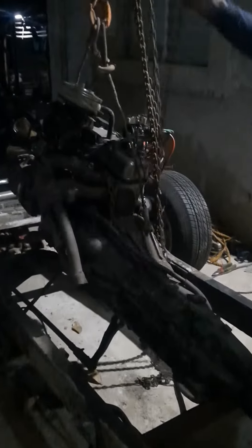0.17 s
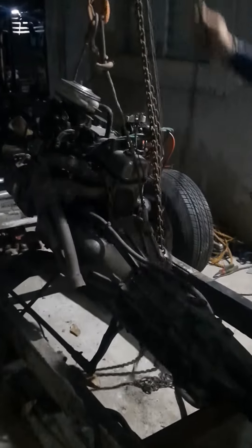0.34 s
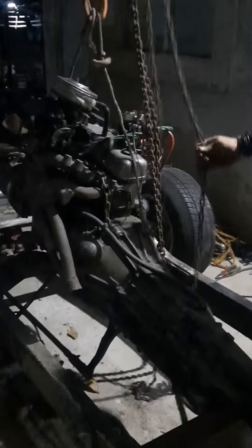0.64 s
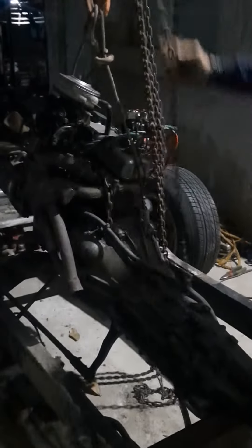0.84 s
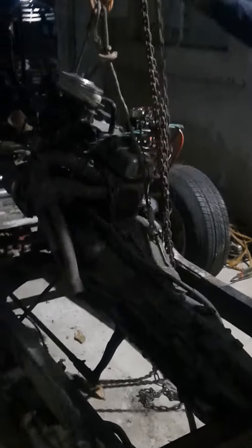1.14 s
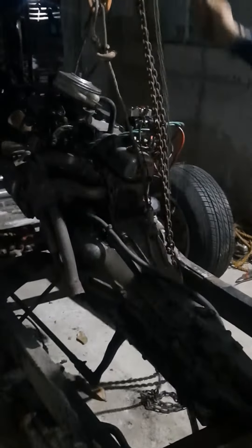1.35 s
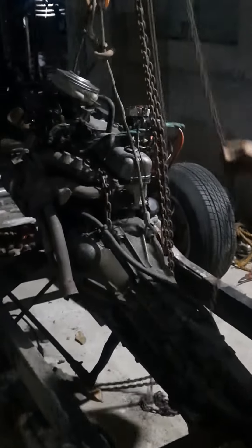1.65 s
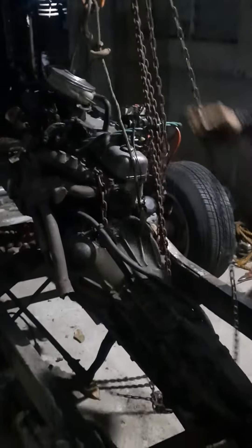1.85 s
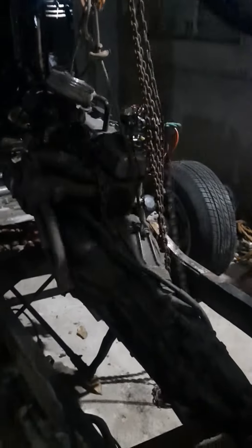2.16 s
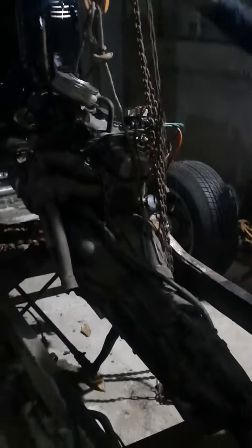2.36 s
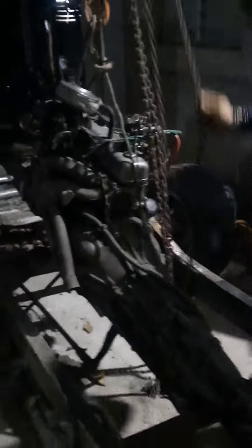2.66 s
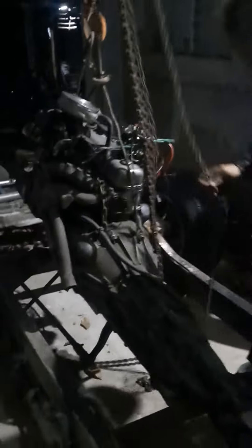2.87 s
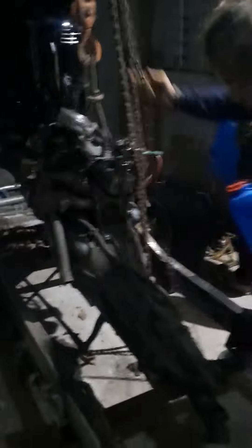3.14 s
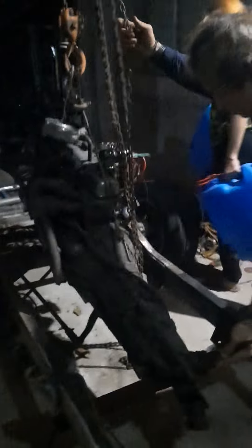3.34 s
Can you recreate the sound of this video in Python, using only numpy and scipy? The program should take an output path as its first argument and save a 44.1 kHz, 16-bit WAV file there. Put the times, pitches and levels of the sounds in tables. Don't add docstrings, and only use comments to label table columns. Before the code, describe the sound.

Chain hoist in a concrete workshop: a few slack link slaps, then three dense bursts of metallic ratcheting with dull knocks and low booms, separated by short lulls; close stereo pickup over quiet hum.

```python
import sys
import numpy as np
from scipy import signal
from scipy.fft import rfft, irfft, next_fast_len
from scipy.io import wavfile
from scipy.ndimage import map_coordinates

SR = 44100
rng = np.random.default_rng(int(sys.argv[2]) if len(sys.argv) > 2 else 0)


def amp(db):
    return 10 ** (np.asarray(db, float) / 20)


def write(x):
    x = np.atleast_2d(x).T
    wavfile.write(sys.argv[1], SR, np.round(np.clip(x, -1, 1) * 32767).astype(np.int16))


N = 154350

# (frequency [Hz], level [dB])
AIR_SPECTRUM = [(18, -38), (30, -23), (59, 2), (81, -4), (526, -17), (632, -19), (16000, -55)]
# (frequency [Hz], decay time t60 [s])
ROOM_T60 = [(200, 0.5), (1500, 0.54), (5000, 0.25), (14000, 0.21)]
# (frequency [Hz], likeness [0-1])
ROOM_LIKENESS = [(150, 0.96), (500, 0.18), (2000, 0.06), (10000, 0.015)]
# (frequency [Hz], likeness [0-1])
NEAR_LIKENESS = [(150, 1), (400, 0.28), (2000, 0.17), (6000, 0.1), (14000, 0.13)]
# (frequency [Hz], level difference [dB])
LEFT_OVER_RIGHT = [(200, 2.5), (1400, -0.8), (4000, 1), (9000, 3), (14000, 3.5)]
# (frequency [Hz], phase [rad])
PORT_PHASE = [(120, -0.17), (350, -0.37), (700, -0.98), (1400, -0.38), (3000, -0.2)]
# (time [s], level [dB])
FRAME_LOAD = [(0, -52.5), (.24, -43), (.3, -38), (.6, -37.5), (.74, -42.5), (.82, -39.5), (1.12, -52),
              (1.24, -50.5), (1.33, -35.5), (1.68, -36), (1.77, -38), (2.0, -41.5), (2.3, -53), (2.5, -37),
              (2.6, -36), (2.69, -34), (3.02, -38.5), (3.5, -48)]
# (frequency [Hz], width [Hz], level [dB])
FRAME_MODES = [(58, 5.3, -3), (112.8, 10.8, -3.5), (147.8, 13.4, -1.5), (169.5, 31, -7.5), (245.3, 53, -9),
               (298, 53.5, -6.5), (359.4, 86, -12.5), (506, 254, -21.5)]
# (time [s], length [s], level [dB], pitch [Hz])
BEAM_BOOMS = [(0.123, 0.059, -40, 135), (0.445, .1, -45, 112), (0.543, 0.091, -35.5, 136),
              (0.63, 0.067, -38, 135), (.77, .1, -38.5, 134), (1.288, 0.11, -38, 135),
              (1.381, 0.07, -29.5, 134), (1.526, 0.096, -30, 135), (1.643, 0.083, -29, 135),
              (1.767, 0.086, -39, 110), (1.926, 0.072, -39, 135), (2.273, 0.054, -38, 130),
              (2.41, 0.071, -34, 112), (2.505, 0.037, -27, 135), (2.653, .07, -30, 138),
              (2.66, .14, -38, 63), (0.83, 0.083, -46, 63)]
# (frequency [Hz], width [Hz], level [dB])
HOUSING_MODES = [(310, 33, -5.5), (710, 81, 1), (1481, 156, -0.5), (1950, 1000, -13.5)]
# (time [s], peak level [dB], pitch [Hz], decay time t60 [s], spread of pitch [0-1])
HOUSING_KNOCKS = [(0.27, -39, 707, 0.07, 0.06), (0.972, -34.5, 984, 0.034, 0.32),
                  (1.275, -37.5, 700, 0.064, 0), (1.322, -21.5, 1310, 0.03, 0.19),
                  (1.327, -23, 224, 0.057, 0.04), (1.348, -33, 695, .07, .06), (1.385, -37, 740, 0.086, 0),
                  (1.44, -36, 722, 0.13, 0.02), (1.479, -32.5, 733, 0.08, 0.03),
                  (1.913, -30, 700, 0.02, 0.2), (2.03, -46, 2170, 0.031, 0.2),
                  (2.095, -39, 1646, 0.09, 0.3), (2.13, -38.5, 1084, 0.04, 0.28),
                  (2.168, -39, 2344, 0.05, 0.2), (2.29, -41, 690, 0.1, 0.15),
                  (2.482, -22.5, 1134, 0.032, 0.23), (2.507, -25, 733, .09, 0.09),
                  (2.532, -31.5, 717, 0.11, .05), (2.755, -28, 703, .08, 0.07),
                  (2.782, -27, 710, 0.064, 0.08), (2.86, -31.5, 1076, 0.045, 0.18),
                  (2.915, -26, 2466, 0.061, 0.05), (3.168, -38.5, 897, 0.077, 0.31),
                  (3.2, -36.5, 2010, 0.093, .35), (3.219, -38, 492, 0.096, 0.16),
                  (3.277, -36.5, 1315, 0.055, 0.24)]
# (time [s], pitch [Hz], level [dB])
GROAN_PATH = [
    (2.79, 927, -52),
    (2.81, 928.6, -40.5),
    (2.85, 984, -38),
    (2.885, 1075, -52),
]
# (time [s], jingle level [dB])
CHAIN_SPEED = [(0, -77), (.21, -49.5), (.27, -41), (.46, -37), (.6, -43), (.77, -51.5), (1.12, -73.5),
               (1.25, -63.5), (1.36, -40.5), (1.58, -36), (1.72, -38.5), (1.9, -63), (2.26, -66),
               (2.41, -42), (2.5, -39.5), (2.72, -34), (3.12, -60), (3.5, -61)]
# (frequency [Hz], width [Hz], level [dB])
STEEL_MODES = [(2100, 20, -7.5), (2337, 17, -5.5), (3890, 73, 2), (4340, 49, -0.5), (4640, 180, 1.5),
               (5360, 46, 1.5), (5940, 49, 0.5), (6870, 200, 8), (7590, 106, 9), (2567, 38, -6),
               (9570, 76, -6.5), (11480, 136, 4), (13800, 300, -9), (14600, 250, -3)]
# (frequency [Hz], level [dB])
CRACK_SPECTRUM = [(500, -30), (1050, -7), (1600, -3), (3100, -4), (4300, 1), (8000, -5), (12000, -8),
                  (16000, -10)]
# (time [s], peak level [dB], brightness [dB])
CHAIN_SLAPS = [(0.0648, -29.5, -38), (0.1304, -40, -11), (0.1418, -23, -17), (0.795, -26.5, -9.5),
               (0.9646, -40, -10), (0.9982, -28, -7), (1.2629, -22, -16), (1.8896, -38.5, -10),
               (1.9124, -35.5, -15), (2.028, -47, -25), (2.0484, -39, -2.5), (2.1251, -36.5, -11),
               (2.17, -43.5, -17), (2.264, -22.5, -15), (2.284, -27, -13), (2.996, -33.5, -5),
               (3.167, -44, -19), (3.27, -38, -34), (3.2808, -32.5, -41), (3.3019, -57, -14),
               (3.3361, -27.5, -13.5), (3.379, -44.5, 1), (3.4603, -34.5, -17)]
# (time [s], peak level [dB], loudest ring [Hz])
FIRST_PULL = [(0.2359, -44, 4510), (0.2493, -26.5, 4000), (0.2623, -20.5, 4570), (0.2862, -18.5, 7150),
              (0.3234, -22.5, 7360), (0.3696, -16, 5360), (0.3994, -25, 3800), (0.4074, -22.5, 3900),
              (0.4384, -29, 4120), (0.4444, -17.5, 7600), (0.4738, -16, 8000), (0.4864, -15, 5430),
              (0.5097, -16.5, 7760), (0.5474, -18.5, 4360), (0.5634, -17.5, 5360), (0.5934, -20, 7720),
              (0.6489, -22, 5330), (0.6844, -27, 3880), (0.7163, -22.5, 7920)]
SECOND_PULL = [(1.293, -27, 5350), (1.3168, -25, 6700), (1.3367, -21, 4460), (1.3499, -13.5, 7900),
               (1.3853, -17.5, 4320), (1.4234, -22, 5360), (1.4346, -15.5, 5800), (1.4656, -14, 7980),
               (1.4774, -19.5, 6070), (1.5047, -15.5, 7800), (1.5117, -27, 4150), (1.5504, -19.5, 3990),
               (1.576, -17.5, 4470), (1.5871, -16, 5860), (1.6207, -17, 7340), (1.6629, -18.5, 5840),
               (1.7095, -20.5, 6000), (1.7614, -28, 3980), (1.7804, -21, 5940)]
THIRD_PULL = [(2.3912, -32.5, 4540), (2.411, -23, 4630), (2.4333, -22, 7460), (2.4781, -17, 4560),
              (2.4847, -14.5, 4500), (2.5323, -16, 6460), (2.5698, -19, 4370), (2.61, -16, 4340),
              (2.6454, -16, 8300), (2.6527, -20, 7500), (2.6778, -13, 4380), (2.6894, -14.5, 6720),
              (2.7194, -15.5, 3840), (2.7501, -17, 3710), (2.7801, -15, 7570), (2.82, -18.5, 5700),
              (2.8567, -20.5, 7900), (2.901, -42, 3800), (2.9133, -19.5, 7500)]

LINK_DETUNE = 0.025


def unit(x):
    return x / np.sqrt(np.mean(x ** 2) + 1e-20)


def along(points, hz):
    f, v = np.transpose(points)
    return np.interp(np.log(hz + 1), np.log(f + 1), v)


def curve(rows):
    return np.interp(np.arange(N) / SR, *np.transpose(rows))


def wobble(rate):
    knots = rng.standard_normal(int(N * rate / SR) + 4)
    return map_coordinates(knots, [np.arange(N) * rate / SR])


def filtered(x, response):
    m = next_fast_len(N + SR // 4)
    return irfft(rfft(x, m) * response(np.fft.rfftfreq(m, 1 / SR)), m)[..., :N]


def peak(f, hz, width_hz):
    damping = 1j * f * width_hz
    return damping / (hz * hz - f * f + damping + 1e-9)


def body(modes):
    return lambda f: sum((-1) ** k * amp(db) * peak(f, hz, w) for k, (hz, w, db) in enumerate(modes))


def train(s, size):
    return np.bincount(np.clip(np.round(s * SR).astype(int), 0, N - 1), size, N)


def ports(mid, side, likeness):
    angle = lambda f: np.arccos(np.clip(along(likeness, f), -1, 1)) / 2
    a, b = filtered(np.array([mid, side]), lambda f: np.array([np.cos(angle(f)), np.sin(angle(f))]))
    return np.array([a + b, a - b])


def rings(s, db, hz, t60, size):
    t = np.arange(size) / SR
    fade = amp(db[:, None] - 60 * t / t60[:, None])
    first = np.clip(np.round(s * SR).astype(int), 0, N)
    at = (first[:, None] + np.arange(size)).ravel()
    slip = np.arccos(np.clip(along(NEAR_LIKENESS, hz), 0, 1)) * rng.standard_normal(len(s))

    def port(side):
        wave = fade * np.sin(2 * np.pi * hz[:, None] * t + (side * slip)[:, None])
        return np.bincount(at, wave.ravel(), N + size + 1)[:N]

    return np.array([port(-0.5), port(0.5)])


def air():
    a, b = filtered(rng.standard_normal((2, N)), lambda f: amp(along(AIR_SPECTRUM, f)))
    return amp(-47) * unit(ports(a, b, ROOM_LIKENESS))


def room(x):
    step, delay = SR // 4, 200
    out = np.zeros((2, N + 2 * SR))
    for start in range(0, N, step):
        hz, t, z = signal.stft(rng.standard_normal((2, SR * 3 // 5)), SR, nperseg=256)
        decay = amp(-60 * t / along(ROOM_T60, hz)[:, None])
        tail = signal.istft(z * decay, SR, nperseg=256)[1]
        tail = tail / np.linalg.norm(tail[0])
        wet = signal.fftconvolve(x[None, start:start + step], tail, axes=1)
        out[:, start + delay:][:, :wet.shape[1]] += wet
    return ports(*out[:, :N], ROOM_LIKENESS)


def frame():
    drone = unit(filtered(rng.standard_normal(N), body(FRAME_MODES)))
    return drone * amp(curve(FRAME_LOAD) - 2.0 + 1.0 * wobble(15))


def booms():
    t, out = np.arange(N) / SR, np.zeros(N)
    for s, length, db, hz in BEAM_BOOMS:
        progress = np.clip((t - s + length / 4) / (1.45 * length), 0, 1)
        swell = np.sin(np.pi * progress) ** 2
        out += amp(db + 1) * swell * np.sin(2 * np.pi * (hz * t + rng.random()))
    return out


def knocks():
    s, db, hz, t60, spread = np.repeat(np.transpose(HOUSING_KNOCKS), 9, axis=1)
    draw = rng.standard_normal((len(s), 3))
    times = s + 0.009 * np.abs(draw[:, 0])
    return rings(times, db - 10.5 + 3 * draw[:, 1], hz * np.exp(spread * draw[:, 2]), t60, size=5000)


def groan():
    t, (at, pitch, level) = np.arange(N) / SR, np.transpose(GROAN_PATH)
    cycles = np.cumsum(np.interp(t, at, pitch) * (1 + 0.026 * wobble(90))) / SR
    loudness = amp(np.interp(t, at, level, -150, -150) + 2.9 * wobble(60))
    octave = amp(-4.5) * np.sin(2 * np.pi * 2 * cycles)
    return loudness * (np.sin(2 * np.pi * cycles) + octave)


def steel(s, db, tilt_db, ring_db, count):
    crack_t60_s, crack_rise_s, mode_spread_db = 0.016, 0.0004, 3
    t = np.arange(SR // 16) / SR
    fade = amp(-60 * t / crack_t60_s) * (1 - np.exp(-t / crack_rise_s))
    gate = lambda size: np.sqrt(np.abs(signal.fftconvolve(train(s, size ** 2), fade ** 2)[:N]))
    noise = ports(*rng.standard_normal((2, N)), NEAR_LIKENESS)
    noise = unit(filtered(noise, lambda f: amp(along(CRACK_SPECTRUM, f))))
    high = filtered(noise, lambda f: 1 / (1 + (9000 / (f + 1)) ** 8))
    crack = gate(amp(db)) * (noise - high) + gate(amp(db + tilt_db)) * high

    draw = rng.random((len(s) * count, 3))
    hz, width, mode_db = np.array(STEEL_MODES)[(draw[:, 0] * len(STEEL_MODES)).astype(int)].T
    level = np.repeat(db + ring_db, count) + mode_db + 2 * mode_spread_db * draw[:, 1]
    level = level + np.repeat(tilt_db, count) * (hz > 9000)
    detuned = hz * (1 + LINK_DETUNE * (2 * draw[:, 2] - 1))
    return crack + rings(np.repeat(s, count), level, detuned, 2.68 / width, size=600)


def jingle():
    contacts_per_s, spread_db = 900, 4
    draw = rng.random((int(N / SR * contacts_per_s), 2))
    s, db = draw[:, 0] * N / SR, -spread_db * np.log(draw[:, 1] + 0.02)
    links = unit(steel(s, db, 0 * s, ring_db=-8.5, count=1))
    return links * amp(curve(CHAIN_SPEED) + 3.0 + 1.8 * wobble(21.85))


def gears():
    grind = unit(filtered(rng.standard_normal(N), body(HOUSING_MODES)))
    return grind * amp(0.72 * curve(CHAIN_SPEED) - 18.0 + 1.2 * wobble(25.3))


def contacts(rows, cut_hz, own_db, knock_db):
    count, spread_s, loss_per_rebound_db, own_t60_s = 7, 0.0055, -1.27, 0.026
    s, db, hz, tilt_db, loss_db = np.transpose(rows)
    draw, order = rng.random((len(s), count, 3)), np.arange(count)
    later = order > 0
    times = (s[:, None] + spread_s * (order + draw[..., 0] * later) / 2).ravel()
    loss = loss_db[:, None] - 5 * draw[..., 1] + loss_per_rebound_db * order
    levels = (db[:, None] + later * loss).ravel()
    links = steel(times, levels - 10.5, np.repeat(tilt_db, count), ring_db=-14.5, count=4)
    own_hz = (hz[:, None] * (1 + LINK_DETUNE * (draw[..., 2] - 0.5))).ravel()
    own = rings(times, levels + own_db, own_hz, own_t60_s + 0 * times, size=600)
    thin = filtered(links + own, lambda f: (1j * f / (cut_hz + 1j * f)) ** 2)
    return thin + filtered(train(times, amp(levels + knock_db)), body(HOUSING_MODES))


def slapping():
    rows = [(s, db + 10.5, 5070, bright_db + 10, -1) for s, db, bright_db in CHAIN_SLAPS]
    return contacts(rows, cut_hz=2200, own_db=-31.5, knock_db=-1.5)


def seating():
    pulls = [*FIRST_PULL, *SECOND_PULL, *THIRD_PULL]
    rows = [(s, db + 6, hz, 5.5, -0.14) for s, db, hz in pulls]
    return contacts(rows, cut_hz=610, own_db=-16.5, knock_db=3.0)


def scene():
    lead_s = 21 / 44100
    low = frame() + booms()
    dull = knocks() + groan()
    chain = jingle() + gears() + slapping() + seating()
    sent = amp(-4.0) * chain[0] + amp(-5) * dull[0] + amp(-9) * low
    field = chain + dull + low + room(sent) + air()

    def half(f):
        phase = np.pi * f * lead_s + along(PORT_PHASE, f) / 2
        return amp(along(LEFT_OVER_RIGHT, f) / 2) * np.exp(1j * phase)

    return filtered(field, lambda f: np.array([half(f), 1 / half(f)]))


def low_pass(x):
    return signal.sosfilt(signal.butter(12, 16840, fs=SR, output="sos"), x)


def record(dry):
    top_hz = 15850
    mix = filtered(dry, lambda f: f < top_hz)
    return low_pass(mix)


dry = scene()
out = record(dry)
write(out)
```